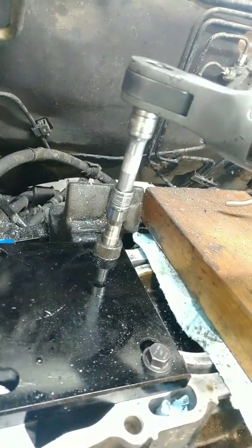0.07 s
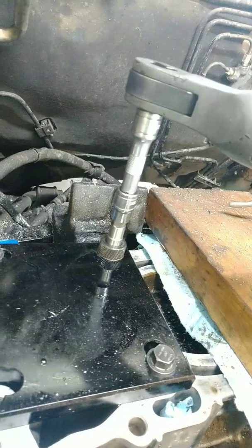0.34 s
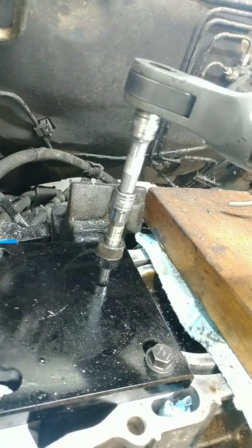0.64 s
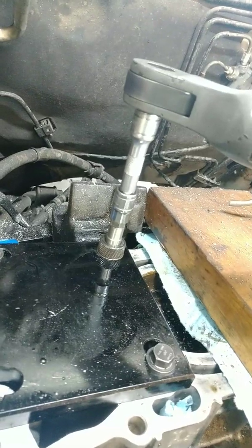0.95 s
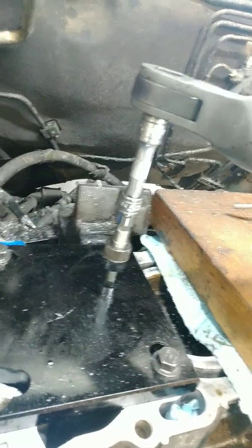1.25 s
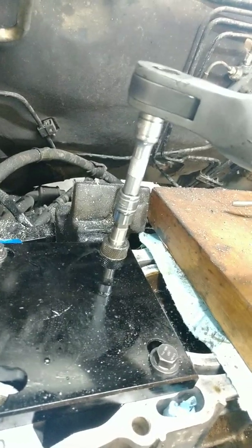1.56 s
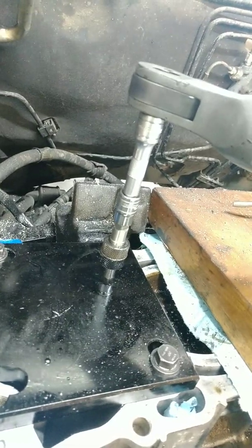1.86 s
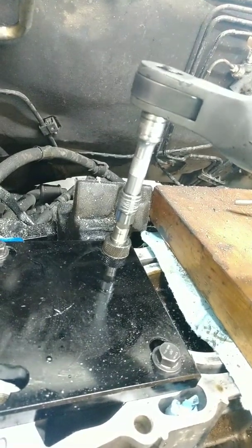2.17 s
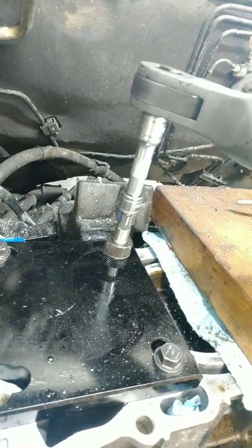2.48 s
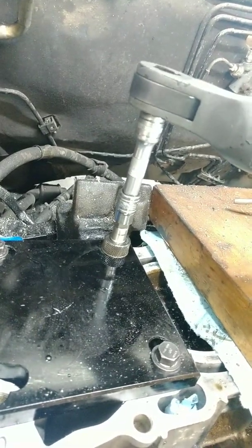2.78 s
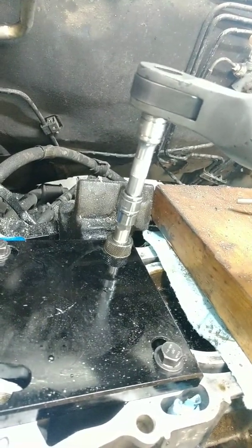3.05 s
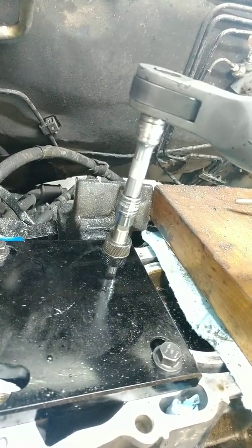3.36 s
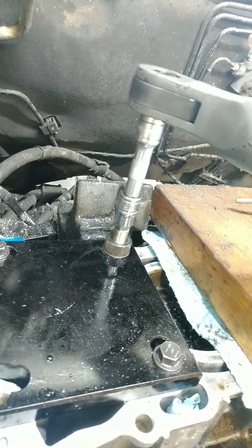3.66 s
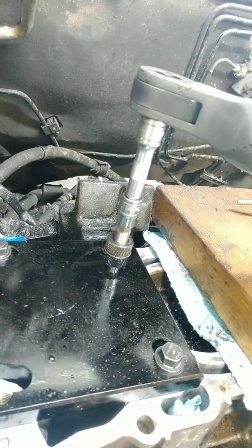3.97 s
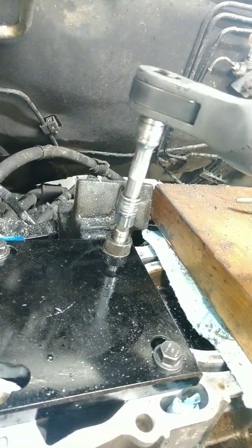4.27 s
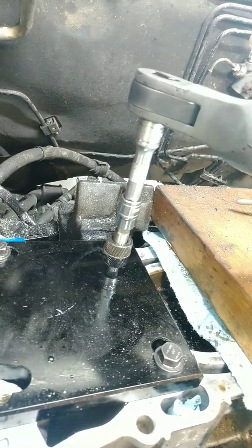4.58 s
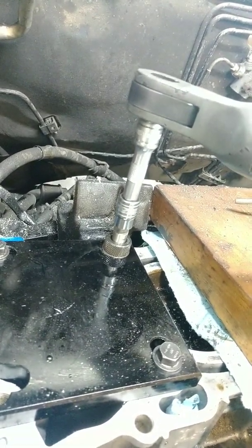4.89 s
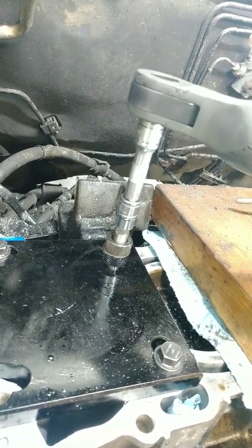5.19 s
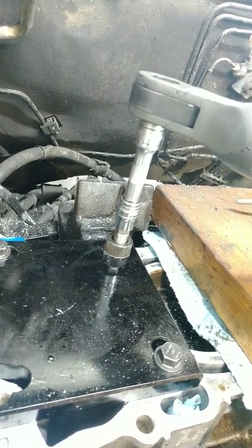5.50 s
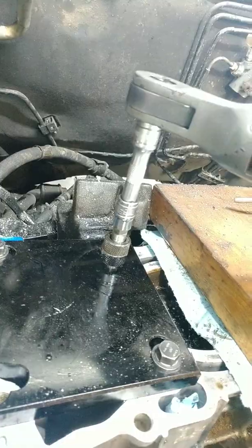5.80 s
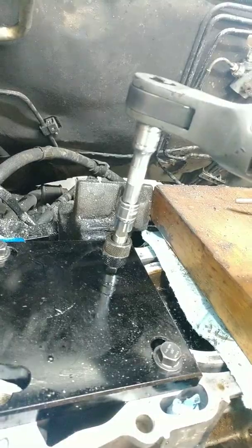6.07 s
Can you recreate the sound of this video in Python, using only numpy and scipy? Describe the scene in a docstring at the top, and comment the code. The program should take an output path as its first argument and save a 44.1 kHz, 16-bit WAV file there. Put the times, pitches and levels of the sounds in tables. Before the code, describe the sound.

Close, rapid steel chatter and motor hum from an electric ratchet turning a tap, with a short judder and scrape near the end.

```python
"""A cordless ratchet turns a tap into an engine block, close up in a workshop.
Every crank stroke knocks three times in the steel head; the knocks brighten in turn as the socket
goes round. The extension bar sings, the pawl zings, the gears rub and the drive hums underneath.
Near the end the tap bites: the motor sags, the tool judders and the cutting edges scrape."""
import sys
import numpy as np
from scipy import signal
from scipy.fft import rfft, irfft
from scipy.io import wavfile
from scipy.ndimage import uniform_filter1d

SR = 44100
rng = np.random.default_rng(int(sys.argv[2]) if len(sys.argv) > 2 else 0)


def master_out(mix):
    """Clip the mix to full scale and print it as 16-bit PCM to the path in sys.argv[1]."""
    frames = np.transpose(np.atleast_2d(mix))
    ceiling = np.clip(frames, -1, 1)
    pcm = np.round(ceiling * 32767).astype(np.int16)
    wavfile.write(sys.argv[1], SR, pcm)


N = 275164
TIME = np.arange(N) / SR


def undb(db):
    """Decibels to gain."""
    return 10 ** (np.asarray(db) / 20)


def level(x, db):
    """Scale to an rms level."""
    return x * undb(db) / np.sqrt(np.mean(x ** 2))


def wander(rate_hz):
    """Smooth random drift with a spread near 1."""
    step = int(SR / rate_hz)
    return uniform_filter1d(np.repeat(rng.standard_normal(N // step + 1), step), step)[:N]


def highpass(x, hz):
    """Gentle low cut."""
    return signal.sosfilt(signal.butter(1, hz, "high", fs=SR, output="sos"), x)


def resonate(x, pitch_hz, width_hz):
    """One decaying mode."""
    return signal.lfilter(*signal.iirpeak(pitch_hz, pitch_hz / width_hz, fs=SR), x)


def ring_modes(x, modes):
    """Ring a bank of modes, each at its own level."""
    return sum(level(resonate(x, pitch_hz, width_hz), db) for pitch_hz, width_hz, db in modes)


def colour(x, points, peaks=(), size=8192):
    """Minimum-phase EQ from points (freq_hz, gain_db) and peaks (centre_hz, width_hz, gain_db)."""
    hz = np.linspace(1, SR / 2, size // 2 + 1)
    point_hz, point_db = np.transpose(points)
    db = np.interp(np.log(hz), np.log(point_hz), point_db)
    for centre_hz, width_hz, peak_db in peaks:
        db = db + peak_db / (1 + (2 * (hz - centre_hz) / width_hz) ** 2)
    cepstrum = irfft(np.log(undb(db)))[:size // 2]
    cepstrum[1:] *= 2
    return signal.fftconvolve(x, irfft(np.exp(rfft(cepstrum, size))))[:len(x)]


def dense_ring(decay_s, rise_s, tail_db, tail_s, size=4096):
    """Many close modes, evened out in spectrum: a brief ring, then a tail strongest in the lows."""
    t = TIME[:size]
    quick, slow = rng.standard_normal((2, size))
    low = signal.sosfilt(signal.butter(2, 2600, fs=SR, output="sos"), slow)
    tail = undb(tail_db) * slow * np.exp(-t / tail_s) + undb(-7.5) * low * np.exp(-t / .0068)
    ring = (1 - np.exp(-t / rise_s)) * (quick * np.exp(-t / decay_s) + tail)
    power = uniform_filter1d(np.abs(rfft(ring)) ** 2, 31)
    return irfft(rfft(ring) / np.sqrt(power))[:3 * size // 4]


def blows(strokes, place, jitter_s, scatter_db, chatter_s, chatter_db, count=380, half_width=8):
    """One uneven blow a stroke, each followed by a bright burst of tiny rebounds."""
    late, force = rng.standard_normal((count, 2)).T
    due_s = np.interp(np.arange(count) + place, strokes, TIME, left=-1, right=-1)
    at = (due_s + jitter_s * late) * SR
    heard = (at > half_width) & (at < N - half_width - 1)
    index = at[heard, None].astype(int) + np.arange(-half_width, half_width + 1)
    pulses = np.zeros(N)
    np.add.at(pulses, index, undb(scatter_db * force[heard, None]) * np.sinc(index - at[heard, None]))
    envelope = signal.lfilter([1], [1, -np.exp(-1 / (chatter_s * SR))], pulses)
    chatter = highpass(envelope * rng.standard_normal(N), 1020)
    return level(pulses, 0) + level(chatter, chatter_db)


def socket_turn(strokes, peak_at, teeth=42):
    """One tooth a stroke: a cosine that peaks once a socket turn, at the fraction peak_at."""
    return np.cos(2 * np.pi * (strokes / teeth - peak_at))


# motor speed in ordinary cutting: time_s, stroke_rate_hz
MOTOR_SPEED = [(0.0, 60.07), (0.362, 60.04), (0.636, 59.28), (1.054, 59.377), (1.492, 58.91),
               (2.324, 59.05), (2.667, 59.606), (3.311, 59.486), (3.96, 59.58), (4.364, 58.25),
               (5.416, 57.723), (6.24, 59.01)]


def motor(caught, free_hz=59.7, load_per_hz=.16, bite_sag_hz=1, bite_load=.65):
    """Running stroke count and load (0-1): the motor slows as it works, and sags when the tap catches."""
    speed_hz = np.interp(TIME, *np.transpose(MOTOR_SPEED))
    strokes = .254 + np.cumsum(speed_hz - bite_sag_hz * caught) / SR
    load = np.clip(load_per_hz * (free_hz - speed_hz) + bite_load * caught, 0, 1)
    return strokes, load


# the three knocks (yoke reverses, pawl drops, pawl drives):
# stroke_fraction, level_db, ring_s, chatter_s, brightest_turn_fraction, treble_swing_db
STROKE_KNOCKS = [(.305, -21.8, .0014, .0007, .65, 1.1), (.545, -20.2, .0014, .0009, .78, 1.2),
                 (.86, -17.4, .0018, .0013, .22, 1.6)]
# tone of each knock: freq_hz, reversal_db, drop_db, drive_db
KNOCK_EQ = [(150, -36, -40, -33), (380, -31, -36, -27), (540, -21, -26, -17), (750, -11, -17, -6),
            (1500, -9, -15, -4), (2800, -9, -7, -2), (4500, -7, -9, 0), (6300, 0, 0, .5),
            (7600, -4, -3, -2), (9400, -3.5, -1, -1), (10800, -3, -.5, -1.5), (12500, -8, -3.5, -4),
            (15500, -12, -9, -9)]
# resonances and dead spots of head, extension and tap: centre_hz, width_hz, gain_db
STEEL_BODY = [(1517, 147, 5), (2005, 100, 3), (2400, 294, -8), (3300, 91, 0), (3690, 150, -2.5),
              (4230, 89, 3), (4610, 320, 2.5), (5210, 99, -3), (5250, 140, 2.5), (6930, 700, 1),
              (7290, 280, -7.5), (8145, 790, -7), (9090, 110, -6.5), (10080, 180, -9)]


def ratchet(strokes, sides=5):
    """Yoke and pawl knock three times a stroke and ring the steel head."""
    out = 0
    for k, (place, db, ring_s, chatter_s, bright_at, swing_db) in enumerate(STROKE_KNOCKS):
        force = blows(strokes, place, jitter_s=.00006, scatter_db=-.32,
                      chatter_s=chatter_s, chatter_db=-1.5)
        # the struck point travels round the head, so the mix of modes shifts with the socket's angle
        knock = 0
        for side in range(sides):
            nearness = 1.33 + socket_turn(strokes, side / sides)
            response = dense_ring(ring_s, rise_s=.0003, tail_db=-15, tail_s=.012)
            knock = knock + nearness ** 2 * signal.oaconvolve(force, response)[:N]
        knock = colour(knock, np.array(KNOCK_EQ)[:, [0, k + 1]], STEEL_BODY)
        # the socket runs out of true, so each contact hardens and softens once a turn
        hardness_db = swing_db * socket_turn(strokes, bright_at)
        out = out + level(knock + (undb(hardness_db) - 1) * highpass(knock, 6400), db)
    return out


# long rings of the extension bar: pitch_hz, width_hz, level_db
BAR_MODES = [(3388, 68, 0), (2085, 60, -14), (10370, 80, -6)]


def extension_bar(strokes):
    """The pawl's drop and drive keep the extension bar singing from stroke to stroke."""
    force = sum(blows(strokes, place, jitter_s=.0002, scatter_db=1, chatter_s=.001, chatter_db=-8)
                for place, *_ in STROKE_KNOCKS[1:])
    return level(ring_modes(force, BAR_MODES), -26.3)


def gears():
    """Gear teeth and brushes rub on between the knocks, through the same steel."""
    rub = rng.standard_normal(N) * undb(1.3 * wander(300))
    drive_eq = np.array(KNOCK_EQ)[:, [0, -1]]
    return level(colour(rub, drive_eq, STEEL_BODY), -19)


# drive hum, on multiples of the stroke rate: harmonic, easy_db, loaded_db
HUM_HARMONICS = [(1, -59, -60), (2, -51, -47.5), (3, -59, -47), (4, -66.5, -56), (5, -54.5, -55),
                 (6, -59, -55.5), (7, -51.5, -54), (8, -48.5, -58.5), (9, -59, -51), (10, -52.5, -51.5),
                 (11, -48, -42.5), (12, -47.5, -44), (13, -51, -41.5), (14, -47, -48), (15, -42, -49),
                 (16, -55, -41), (17, -48, -48), (18, -48.5, -48), (19, -52, -44), (20, -50, -50)]


def drive_hum(strokes, load, waver_per_harmonic=.044, waver_max=.46):
    """The yoke thumps the housing on each driving swing; load fills out the hum."""
    out = 0
    # the third harmonic ducks once a socket turn, less so under load
    dip_db = -14 * (1 - load) * np.exp(3.2 * (socket_turn(strokes, .95) - 1))
    for harmonic, easy_db, loaded_db in HUM_HARMONICS:
        db = easy_db + load * (loaded_db - easy_db) + dip_db * (harmonic == 3)
        # higher harmonics waver deeper and faster
        swells_per_turn = np.ceil(harmonic / 7)
        sway = .97 * wander(14) + socket_turn(swells_per_turn * strokes, rng.uniform())
        waver = 1 + min(waver_per_harmonic * harmonic, waver_max) * sway
        phase = 2 * np.pi * harmonic * strokes + rng.uniform(-1.67, 1.83) + .036 * harmonic * wander(20)
        out = out + np.sqrt(2) * undb(db) * waver * np.cos(phase)
    return out


# workshop room tone: freq_hz, gain_db
ROOM_EQ = [(20, -8), (70, -1), (150, 0), (400, 2), (2000, -2.5), (15000, -48)]


def workshop():
    """A faint, steady bed of dark noise."""
    return level(colour(rng.standard_normal(N), ROOM_EQ), -50)


def pawl_zing(strokes, pitch_hz=10450, width_hz=1300):
    """On a short arc of each socket turn the pawl scrapes over the teeth and zings."""
    drop_place = STROKE_KNOCKS[1][0]
    force = blows(strokes, drop_place, jitter_s=.0002, scatter_db=2, chatter_s=.003, chatter_db=9)
    zing = resonate(resonate(force, pitch_hz, width_hz), pitch_hz, width_hz)
    arc = np.exp(8 * (socket_turn(strokes, .814) - 1))
    return level(arc * zing, -32.5)


# tone of the tap's thuds in the block: freq_hz, gain_db
JUDDER_EQ = [(100, -26), (450, -20), (650, -5.5), (1000, -3.5), (1600, -0.5), (2500, -6), (6000, -2.5),
             (15000, -23)]


def tap_judder(strokes, load):
    """Under load the tap slips twice a stroke and thuds into the block."""
    thuds = 0
    for place in (.17, .68):
        slips = blows(strokes, place, jitter_s=.00029, scatter_db=-2.5, chatter_s=.0015, chatter_db=-4)
        block = dense_ring(.0035, rise_s=.00033, tail_db=-10, tail_s=.015)
        thuds = thuds + signal.oaconvolve(slips, block)[:N]
    return load * level(colour(thuds, JUDDER_EQ), -22)


# rings of the cutting tap: pitch_hz, width_hz, level_db
TAP_MODES = [(3290, 90, -1), (5390, 130, 0), (5615, 50, -3), (6035, 80, -4)]


def tap_scrape(load):
    """Under load the cutting edges scrape and the tap rings."""
    return np.sqrt(load) * level(ring_modes(rng.standard_normal(N), TAP_MODES), -32)


def tap_bite(start_s=5.0, grip_s=.13, end_s=5.68, release_s=.15):
    """How firmly the tap is caught (0-1): it grips, holds and breaks free."""
    return np.clip(np.minimum((TIME - start_s) / grip_s, (end_s - TIME) / release_s), 0, 1)


# how the steel's sound spreads to the microphone: freq_hz, gain_db
RADIATION_EQ = [(200, -5), (500, 1.5), (800, -0.5), (1500, -1), (2900, 2), (4200, -2.5), (6300, -0.5),
                (9500, 1.5), (12500, -1), (14000, 1.5), (15500, -3)]


def scene():
    """The crank sets the tool's rhythm; load brings in the judder and the scrape, over room tone."""
    strokes, load = motor(tap_bite())
    room = workshop()
    steel = ratchet(strokes) + extension_bar(strokes) + pawl_zing(strokes) + gears()
    steel = undb(-.5 * load) * colour(steel, RADIATION_EQ)  # a slower motor knocks less hard
    return (steel + drive_hum(strokes, load) + tap_judder(strokes, load) + tap_scrape(load) + room)[None]


def record(dry, ceiling=.9, top_hz=15520):
    """Soft clipping rounds the loudest peaks; a steep low-pass cuts the top."""
    rounded = dry / (1 + (dry / ceiling) ** 6) ** (1 / 6)
    lowpass = signal.firwin(801, top_hz, window="blackman", fs=SR)
    return signal.fftconvolve(rounded, lowpass[None], "same")


dry = scene()
out = record(dry)
master_out(out)
```